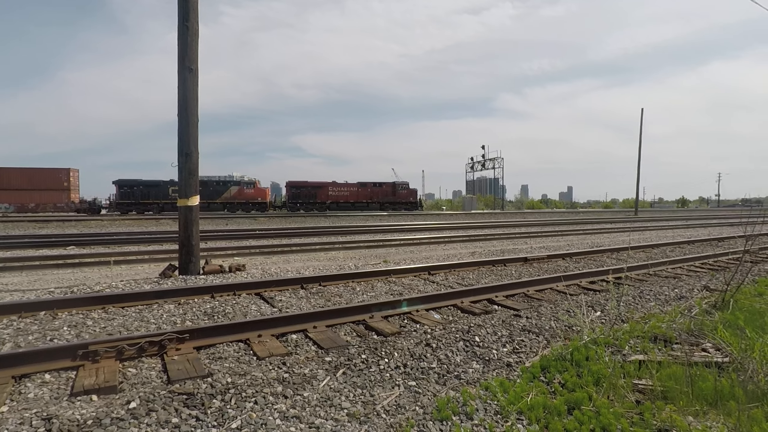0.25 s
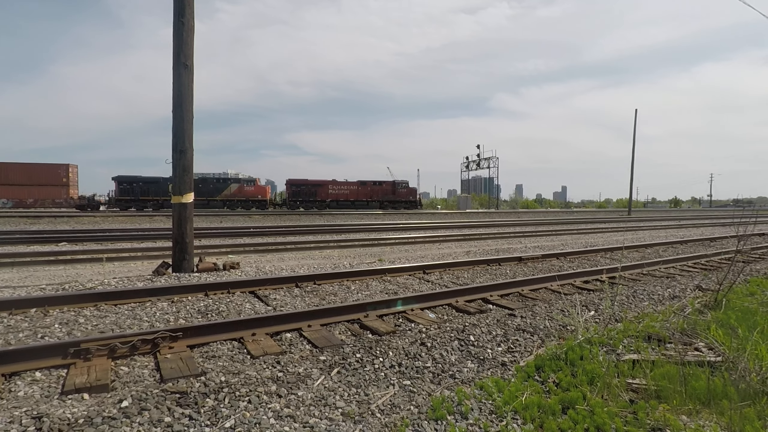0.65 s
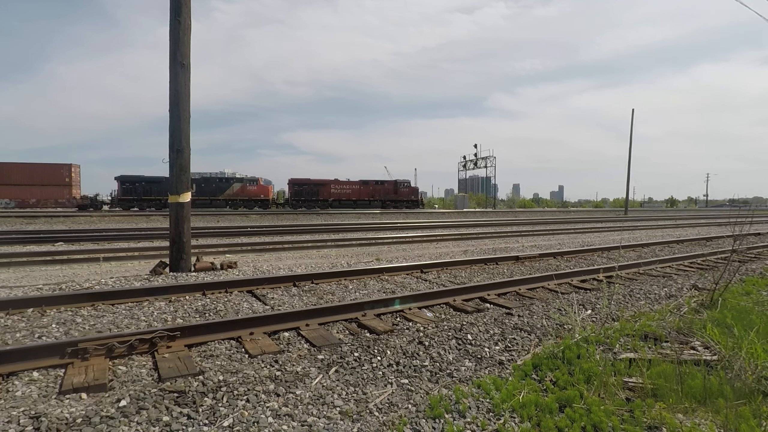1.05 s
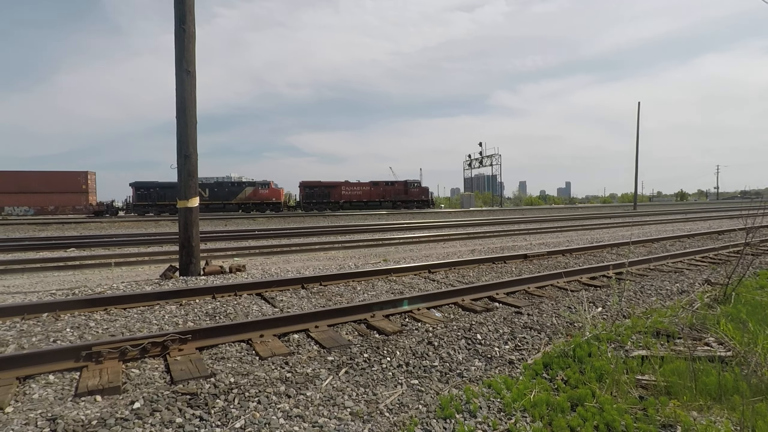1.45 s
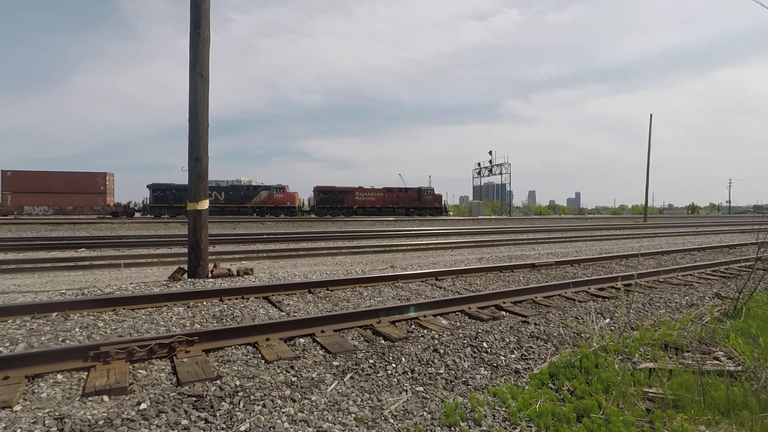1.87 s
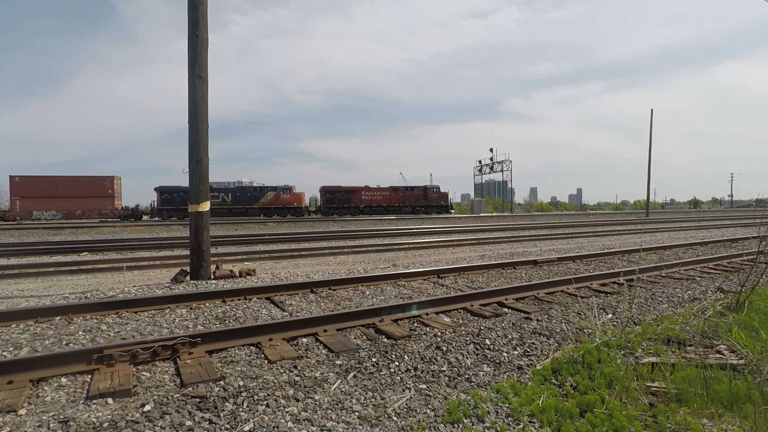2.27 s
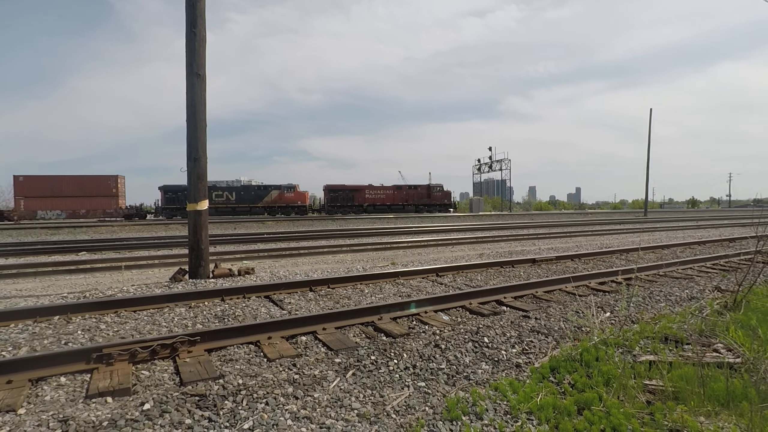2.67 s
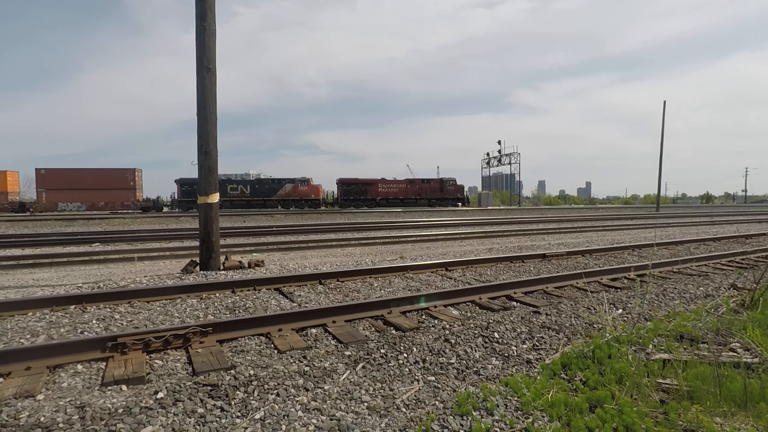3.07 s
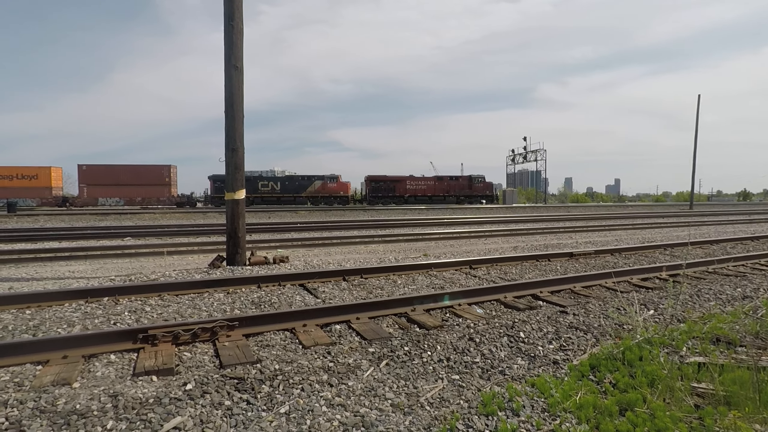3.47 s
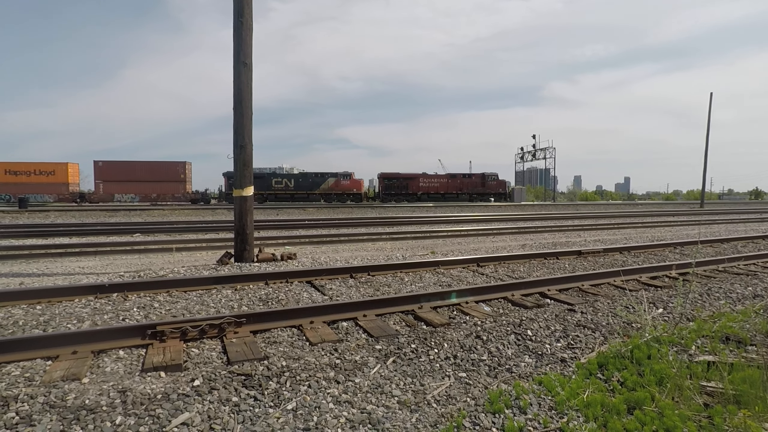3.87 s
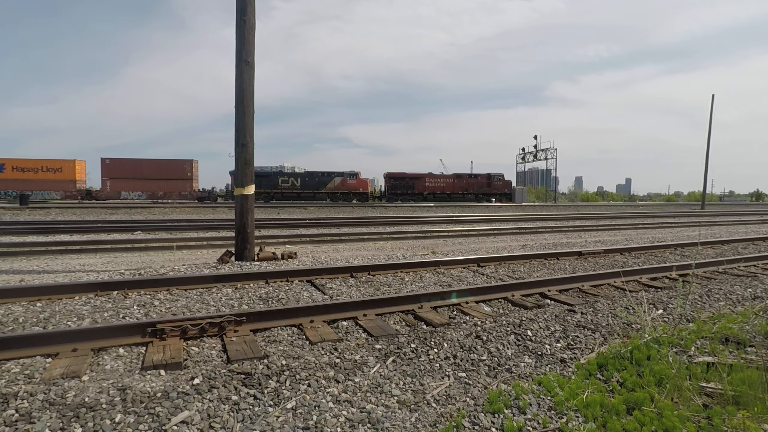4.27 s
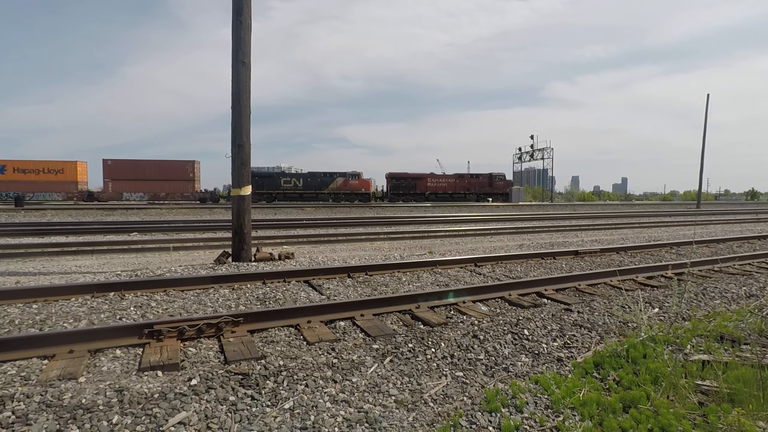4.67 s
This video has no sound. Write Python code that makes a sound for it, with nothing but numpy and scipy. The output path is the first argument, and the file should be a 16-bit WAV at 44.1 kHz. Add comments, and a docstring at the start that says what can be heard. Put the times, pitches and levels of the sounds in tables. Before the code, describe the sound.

Diesel locomotives throb with a deep, steady low rumble across an open yard, with faint fan whine and wheel hiss, ending in wind buffeting.

```python
"""Two diesel locomotives haul a freight train slowly across an open rail yard, some way off.
At first their exhausts, sums of engine-cycle harmonics, largely cancel and throb once a cycle.
Filtered noise gives fan roar, whirr and hiss, wavering sines whine, and flanges rub softly.
The first exhaust fades sooner and the second dominates a drone; a dull knock and dry ticks follow.
At the end gusts of low noise flutter on the microphone among dull knocks, damped sines."""
import sys
import numpy as np
from scipy import signal
from scipy.fft import rfft, irfft
from scipy.io import wavfile
from scipy.ndimage import uniform_filter1d, minimum_filter1d

SR = 44100
rng = np.random.default_rng(int(sys.argv[2]) if len(sys.argv) > 2 else 0)


def transcribe(signal):
    """Save signal, clipped to [-1, 1], as a 16-bit WAV file at the path in sys.argv[1]."""
    frames = np.atleast_2d(signal).T
    limited = np.clip(frames, -1, 1)
    pcm = np.round(limited * 32767).astype(np.int16)
    wavfile.write(sys.argv[1], SR, pcm)


N = 217272
TIME = np.arange(N) / SR  # s
BINS = np.fft.rfftfreq(N, 1 / SR)  # Hz

CYCLE_HZ = 4.835  # engine cycles per second
THROB_S = 1.107  # the moment of one exhaust burst


def gain_of(db):
    """Level law: decibels to an amplitude factor."""
    return 10 ** (np.asarray(db) / 20)


def evened(x):
    """Normalization: a signal scaled to rms 1."""
    return x / np.sqrt(np.mean(x ** 2) + 1e-20)


def read(points):
    """Interpolation: a table over frequency, joined on a logarithmic axis."""
    hz, value = np.transpose(points)
    return np.interp(np.log(BINS + 1), np.log(hz + 1), value)


def drift(rate_hz):
    """Low-pass noise: slow random variation of rms 1."""
    return evened(irfft(rfft(rng.standard_normal(N)) * np.exp(-(BINS / rate_hz) ** 2), N))


def passing(peak_s, db, width_s):
    """Pass-by: the level in dB of a source rolling by has a bell-shaped amplitude around its peak."""
    return db - 20 / np.log(10) * ((TIME - peak_s) / width_s) ** 2


def receding(db, fade_db_per_s):
    """Spreading loss: the level in dB of a source that draws away falls evenly."""
    return db - fade_db_per_s * TIME


def swells(rows):
    """Level modulation: smooth Gaussian lifts in dB."""
    return sum(db * np.exp(-((TIME - s) / length) ** 2) for s, length, db in rows)


def panned(db, left_right_db):
    """Interaural level difference: a left and a right gain, half of it on each side."""
    return gain_of([[db + left_right_db / 2], [db - left_right_db / 2]])


# Likeness of the two microphone ports.
# Each row: frequency in Hz, coherence (held within 0 to 1).
PORT_COHERENCE = [(60, 1.6), (240, 0.8), (470, 0.57), (930, 0.37), (1850, 0.78), (3680, 0.96), (7310, 0.5),
                  (12000, -0.5)]
# Phase between the ports. Each row: frequency in Hz, lead of the left in radians.
PORT_LEAD = [(200, 0.46), (600, 0.15), (1210, -1.1), (1550, -0.82), (1810, -0.15), (2070, 0.64),
             (2410, -0.77), (3270, -0.66), (5200, -0.072), (6000, 0.98), (6600, -0.42)]
# Level between the ports. Each row: frequency in Hz, left minus right in dB.
PORT_TILT = [(60, -3.5), (300, -3.5), (510, 4.5), (860, 0.5), (1470, -0.5), (2510, -1), (4290, -1),
             (7000, 3.5), (9000, -6), (13000, -1)]


def distant(shape):
    """Partial coherence: shaped noise reaches two ports alike in part, with phase and level differences."""
    a, b = rfft(rng.standard_normal((2, N)))
    same = np.clip(read(PORT_COHERENCE), 0, 1)
    side = gain_of(read(PORT_TILT) / 2)
    right = (same * a + np.sqrt(1 - same ** 2) * b) * np.exp(-1j * read(PORT_LEAD))
    pair = irfft(np.array([a * side, right / side]) * shape, N)
    return pair / pair.mean(0).std()


def patchy(pair, depth_db=1.5, length_s=0.2, width_hz=170):
    """Level variation: narrow bands of a noise rise and sink at random."""
    hz, s, spectrum = signal.stft(pair, SR, nperseg=1024, noverlap=768)
    noise = rng.standard_normal(spectrum.shape[1:])
    field = uniform_filter1d(noise, max(int(width_hz / hz[1]), 1), 0)
    field = evened(uniform_filter1d(field, max(int(length_s / s[1]), 1), 1))
    varied = spectrum * gain_of(depth_db * field)
    return signal.istft(varied, SR, nperseg=1024, noverlap=768)[1][:, :N]


def breeze(db=-40, top_hz=30, swell_db=2):
    """Wind pressure: moving air presses deeply and unevenly on the microphone."""
    return gain_of(db + swell_db * drift(2)) * drift(top_hz)


# Gusts on the microphone.
# Each row: peak time in seconds, length in seconds, level in dB, left minus right in dB.
GUST_EVENTS = [(4.48, .03, -36, -2), (4.547, .007, -29, -8), (4.561, .016, -28, -8), (4.654, .01, -31, 10),
               (4.692, .016, -27, 8), (4.716, .005, -25, 2), (4.732, .026, -23.5, 9), (4.769, .013, -26, 7),
               (4.793, .006, -28, -2)]


def gusts(low_hz=150, top_hz=320, lump_db=0.4, opposed=0.56):
    """Turbulence: lumpy low noise, partly opposite in sign between left and right."""
    high_pass = 1 + (low_hz / (BINS + 1)) ** 6
    low_pass = (1 + (BINS / top_hz) ** 4) * (1 + (BINS / 900) ** 8)
    shape = 1 / np.sqrt(high_pass * low_pass)
    a, b = evened(irfft(rfft(rng.standard_normal((2, N))) * shape, N))
    right = np.sqrt(1 - opposed ** 2) * b - opposed * a
    lumps = evened(np.array([a, right]) * gain_of(lump_db * drift(130)))
    envelope = sum(panned(db, pan) * np.exp(-((TIME - s) / length) ** 2)
                   for s, length, db, pan in GUST_EVENTS)
    return lumps * envelope


# Small dry ticks close by. Each row: start in seconds, starting level in dB.
TICK_EVENTS = [(3.479, -46), (3.4852, -37.5), (3.508, -41)]


def ticks(centre_hz=6800, width_hz=2500, decay_s=0.0014):
    """Impulsive sound: bright noise starts at once and decays exponentially."""
    snaps = sum(gain_of(db) * np.exp(-abs(TIME - s) / decay_s) * (TIME >= s) for s, db in TICK_EVENTS)
    return distant(np.exp(-((BINS - centre_hz) / width_hz) ** 2)) * snaps


# Dull knocks. Each row: start in seconds, pitch in Hz, level in dB before rise and decay,
# left minus right in dB.
KNOCK_EVENTS = [(2.952, 415, -30, 0), (4.546, 255, -23, -9), (4.684, 270, -23, 9), (4.711, 430, -27, 4),
                (4.728, 435, -25, 9), (4.766, 430, -32, 5), (4.786, 480, -32, -2)]


def knocks(rise_s=0.0029, decay_s=0.013):
    """Damped resonance: each soft bump is one short dull ring, most of them nearer to one port."""
    out = np.zeros((2, N))
    for s, hz, db, pan in KNOCK_EVENTS:
        age = np.maximum(TIME - s, 0)
        envelope = (1 - np.exp(-age / rise_s)) * np.exp(-age / decay_s)
        out += panned(db, pan) * envelope * np.sin(2 * np.pi * hz * age)
    return out


# Wheel flanges rubbing the rail. Each row: peak time in seconds, length in seconds,
# centre frequency in Hz, width in Hz, level in dB.
FLANGE_RUBS = [(0.184, 0.27, 3040, 1120, -46), (1.152, 0.23, 3950, 2290, -46.5),
               (1.855, 0.39, 4600, 1490, -57), (2.95, 0.28, 4210, 3120, -51.5)]


def flanges():
    """Friction noise: steel rubbing on steel swells softly in a band of noise."""
    out = np.zeros((2, N))
    for s, length, hz, width, db in FLANGE_RUBS:
        band = distant(np.exp(-((BINS - hz) / width) ** 2))
        out += band * gain_of(db) * np.exp(-((TIME - s) / length) ** 2 / 2)
    return out


# Tones of fans and gears. Each row: frequency in Hz, peak rms level in dB between the two sides,
# frequency waver in Hz, peak time in seconds, swell width in seconds.
FAN_AND_GEAR_TONES = [(459.4, -52, 1.3, 0.91, 3.2), (612.3, -56, 1.6, 1.1, 2.6),
                      (622.3, -52.5, 1.4, 0.98, 2.7), (809, -57.5, 2, 1.8, 4), (830, -52.5, 3, 0.35, 0.5),
                      (868, -60.5, 2, 0.72, 1.1), (2370, -74.5, 4.5, 1, 4), (3480, -80.5, 9.7, 1, 4),
                      (7430, -72, 8.9, 1, 4)]


def whines(flutter_db=0.44):
    """Frequency modulation: thin wavering tones swell and fade as the locomotives roll by."""
    out = np.zeros(N)
    for hz, db, waver_hz, peak_s, width_s in FAN_AND_GEAR_TONES:
        turns = np.cumsum(hz + waver_hz * drift(7.4)) / SR
        level = passing(peak_s, db, width_s) + flutter_db * drift(0.68)
        out += gain_of(level) * evened(np.sin(2 * np.pi * turns))
    return out * panned(0, 2)


# Spectrum of the wheel hiss. Each row: frequency in Hz, relative level in dB.
HISS_SPECTRUM = [(1500, -28), (2250, -7), (2450, 2.5), (2780, -1), (3100, 0), (4400, 1), (5350, -5),
                 (6000, -2.5), (7400, -8.5), (8200, -15), (10000, -16.5), (12300, -27), (14000, -50.5)]


def wheels(stir, ripple_db=1.4, ripple_hz=603):
    """Comb filtering: a short reflection ripples the spectrum of the wheel hiss."""
    ripple = ripple_db * np.cos(2 * np.pi * BINS / ripple_hz)
    hiss = patchy(distant(gain_of(read(HISS_SPECTRUM) + ripple)), depth_db=2.0)
    return hiss * gain_of(receding(-48, fade_db_per_s=0.41) + stir)


# Spectrum of the whirr. Each row: frequency in Hz, relative level in dB.
WHIRR_SPECTRUM = [(1000, -56), (1480, -30.5), (1660, -2), (1820, 3), (1960, -7.5), (2080, -17.5),
                  (2220, -40), (3500, -68.5)]
# Brief flares of the whirr. Each row: peak time in seconds, length in seconds, lift in dB.
WHIRR_FLARES = [(.19, 0.03, 7), (.4, 0.018, 1), (.62, 0.032, 4.5), (.8, 0.057, 2.5), (1.03, 0.03, 5),
                (1.22, 0.13, 3.5), (1.38, 0.025, 4.5), (1.84, .022, 4), (1.905, 0.015, 7), (2.7, 0.078, 4),
                (3.08, 0.016, 10.5), (4.35, 0.029, 6), (4.545, 0.046, 4.5)]


def blower(stir, flutter_db=0.84):
    """Narrow-band noise: a high whirr flutters and flares briefly."""
    whirr = patchy(distant(gain_of(read(WHIRR_SPECTRUM))), depth_db=1.0, length_s=0.13, width_hz=90)
    level = receding(-41.5, fade_db_per_s=0.71) + swells(WHIRR_FLARES)
    return whirr * gain_of(level + stir + flutter_db * drift(25))


# Spectrum of the fan roar. Each row: frequency in Hz, relative level in dB.
ROAR_SPECTRUM = [(150, -28), (350, -0.5), (520, -4), (640, -1), (720, -1.5), (820, 0.5), (1000, -3),
                 (1220, 0.4), (1380, -5.5), (1600, -4), (2000, -3), (2250, -22), (4000, -43.5)]


def fans(stir):
    """Broadband flow noise: the fans roar, fading as the train draws away."""
    roar = patchy(distant(gain_of(read(ROAR_SPECTRUM))), depth_db=0.8, width_hz=60)
    return roar * gain_of(receding(-39, fade_db_per_s=1.14) + stir)


# The rumble is strongest while the first exhaust is.
# Each row: peak time in seconds, length in seconds, lift in dB.
RUMBLE_LIFTS = [(1.4, 0.98, 3.5)]


def rumble_level():
    """Spreading loss: the rumble's level in dB swells, then fades as the train draws away."""
    return receding(-34.5, fade_db_per_s=0.05) + swells(RUMBLE_LIFTS)


# Spectrum of the exhaust rumble. Each row: frequency in Hz, relative level in dB.
RUMBLE_SPECTRUM = [(15, -13.5), (35, 0), (70, -4), (115, 4.5), (170, 6), (230, -9), (310, -12), (380, -19),
                   (480, -24), (900, -56)]


def stack(pulse, chuff_db=2):
    """Amplitude modulation: exhaust rumble rises and falls with the engine's pulse."""
    return distant(gain_of(read(RUMBLE_SPECTRUM))) * gain_of(rumble_level() + chuff_db * pulse)


def machinery(angle, pulse_db=0.48, air_db=0.5):
    """Amplitude modulation: noises pulse with the engine; air on the way stirs all but the rumble."""
    pulse = evened(sum(np.cos(order * (angle + np.pi)) for order in (1, 3, 6, 12)))
    stir = pulse_db * pulse + air_db * drift(18.0)
    return stack(pulse) + fans(stir) + blower(stir) + wheels(stir)


def rattle(angle, db=-44.0, slope_db=-52, uneven_db=3, waver_db=1.0, early_s=.037, count=40):
    """Harmonic series: faint upper tones of the cycle bunch loosely at the start of each chug."""
    out = np.zeros(N)
    first, scatter_rad = 38, 1.5
    rumble = rumble_level()
    early_angle = angle + 2 * np.pi * CYCLE_HZ * early_s
    for order in range(first, first + count):
        level = db + slope_db * np.log10(order / first)  # slope in dB per tenfold frequency
        level = level + uneven_db * (2 * rng.random() - 1) + waver_db * drift(1.0)
        out += gain_of(level) * np.cos(order * early_angle + scatter_rad * rng.standard_normal())
    return out * gain_of(rumble - rumble.mean())


# The dips grow from the first moment and reach full depth with the dip at the second.
DIPS_FROM_S, DIP_S = 2.6, 4.001
# The moment of one surge between the chugs, and the time over which the surges die away.
SURGE_S, SURGE_FADE_S = .168, 2.2


def from_nearest(moment_s):
    """Periodicity: seconds from the nearest repeat of a moment, once an engine cycle."""
    return (((TIME - moment_s) * CYCLE_HZ + .5) % 1 - .5) / CYCLE_HZ


def dips(depth=0.28, length_s=0.017, surge_db=2.0, surge_length_s=0.022):
    """Amplitude modulation: early, short surges between the chugs; later, brief dips in the drone."""
    surge_shape = np.exp(-(TIME / SURGE_FADE_S) ** 2 - (from_nearest(SURGE_S) / surge_length_s) ** 2)
    grown = np.clip((TIME - DIPS_FROM_S) / (DIP_S - DIPS_FROM_S), 0, 1)
    dip = depth * grown * np.exp(-(from_nearest(DIP_S) / length_s) ** 2)
    return gain_of(surge_db * surge_shape) * (1 - dip)


def chug(hz, centre_hz, delay_s, sweep_s_per_hz):
    """Dispersion: the lag of a tone in radians when delay changes evenly with pitch."""
    offset_hz = hz - centre_hz
    return 2 * np.pi * offset_hz * (delay_s + sweep_s_per_hz * offset_hz / 2)


# Pipes and manifold delay each pitch differently, so a burst becomes a gliding chug.
# Each row: centre in Hz, delay there in seconds, added delay in seconds per Hz.
FIRST_CHUG, FIRST_BARK = (72.525, -.06855, .004835), (145.05, -.06723, -.001464)
SECOND_CHUG, SECOND_BARK = (72.105, .01194, -.003317), (157.92, -.1195, -.00745)
BARK_ABOVE_HZ = 104  # tones above belong to an exhaust's bark, those below to its chug
SECOND_SLOWER_HZ = .0019  # the second engine's cycle is slower by this, so the tones beat slowly
# Exhaust tones. Each row: multiple of the engine cycle, peak level in dB of the first exhaust,
# peak level in dB of the second, time in seconds when the first is loudest,
# width of the first's swell in seconds.
EXHAUST_TONES = [(6, -23.4, -53.8, 0.6, 2.2), (10, -36.7, -36.4, 0.0, 0.8), (11, -26.4, -52.9, 1.8, 3.5),
                 (12, -6.3, -6.2, 1.5, 3.5), (13, -25.6, -28.6, 1.5, 2.2), (14, -25.9, -30.1, 0.9, 1.1),
                 (15, -1.7, -0.8, 0.6, 3.5), (16, -16.2, -27.6, 0.6, 1.1), (17, -15.8, -34.6, 0.6, 1.8),
                 (18, -17.2, -53.4, 1.8, 2.2), (19, -16.3, -21.2, 0.0, 1.4), (20, -32.8, -53.3, 1.5, 1.1),
                 (21, -16.3, -23.5, 1.8, 2.2), (22, -32.7, -52.4, 2.7, 1.4), (23, -25.5, -33.3, 0.9, 1.4),
                 (24, -48.4, -39.5, 0.0, 0.8), (25, -36.6, -52.9, 2.4, 1.4), (26, -22.8, -24.5, 0.6, 3.5),
                 (27, -31.4, -37.6, 0.9, 1.4), (28, -44.9, -33.8, 0.0, 0.8), (29, -44.0, -39.9, 2.4, 0.8),
                 (30, -25.3, -35.6, 1.2, 1.1), (31, -33.4, -49.3, 1.8, 1.1), (32, -31.0, -35.9, 0.0, 0.8),
                 (33, -31.3, -33.4, 2.7, 1.4), (34, -25.8, -52.9, 1.2, 1.1), (35, -32.4, -52.8, 1.5, 0.8),
                 (36, -33.6, -43.2, 0.0, 0.8), (37, -33.1, -42.3, 1.2, 1.4)]


def exhaust(angle):
    """Superposition: opposed exhausts largely cancel; the first fades sooner, the second dominates."""
    second_pass = passing(peak_s=1.854, db=0, width_s=3.564)
    second_angle = angle - 2 * np.pi * SECOND_SLOWER_HZ * (TIME - THROB_S)
    out = np.zeros(N)
    for order, first_db, second_db, peak_s, width_s in EXHAUST_TONES:
        hz = order * CYCLE_HZ
        is_bark = hz > BARK_ABOVE_HZ
        first_lag = chug(hz, *(FIRST_BARK if is_bark else FIRST_CHUG))
        second_lag = chug(hz, *(SECOND_BARK if is_bark else SECOND_CHUG))
        first = gain_of(passing(peak_s, first_db, width_s)) * np.cos(order * angle - first_lag)
        second = gain_of(second_pass + second_db) * np.cos(order * second_angle - second_lag)
        waver_db = .25 * drift(1.5)
        out += (first - second) * gain_of(waver_db)
    return out * dips() * panned(0, -.8)


def scene():
    """Superposition: governed engines at almost constant speed, the train, and the air and bumps."""
    angle = 2 * np.pi * CYCLE_HZ * (TIME - THROB_S) + 0.002 * drift(1.5)
    train = exhaust(angle) + rattle(angle) + machinery(angle) + whines() + flanges()
    return train + breeze() + gusts() + knocks() + ticks()


def record(dry, ceiling_db=-5.5, hold_s=0.0021, split_hz=260, edge_hz=14800):
    """Peak limiting: bass peaks are held down, treble passes; then a low-pass limits the band."""
    bass = irfft(rfft(dry) / (1 + (BINS / split_hz) ** 4), N)
    hold = max(int(hold_s * SR), 1)
    room = np.minimum(gain_of(ceiling_db) / (abs(bass).max(0) + 1e-9), 1)
    held = minimum_filter1d(room, hold)
    gain = uniform_filter1d(uniform_filter1d(held, hold), hold // 2 + 1)
    soft_start = np.sin(np.pi / 2 * np.minimum(TIME / hold_s, 1)) ** 2
    limited = (dry - bass * (1 - gain)) * soft_start
    low_pass = signal.firwin(511, edge_hz, window=("kaiser", 9), fs=SR)
    return signal.oaconvolve(limited, low_pass[None], "same")


dry = scene()
out = record(dry)
transcribe(out)
```